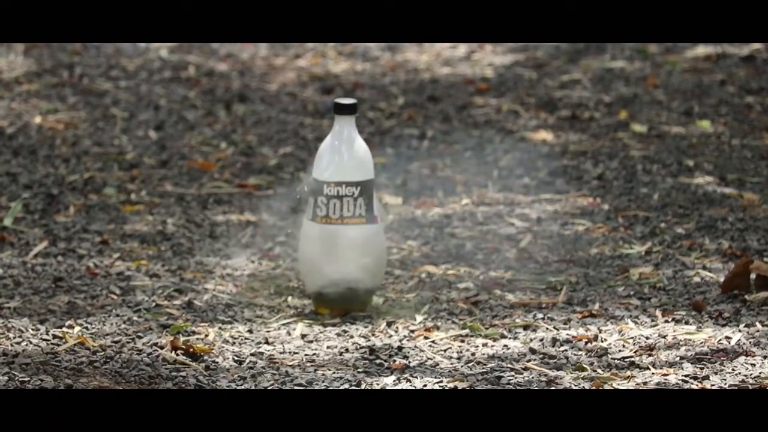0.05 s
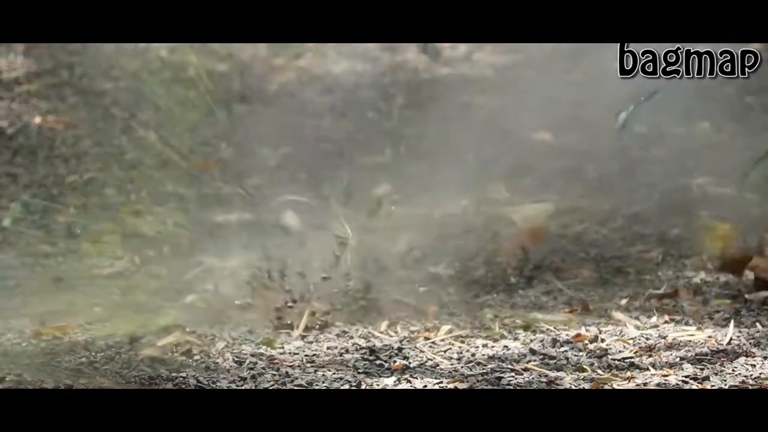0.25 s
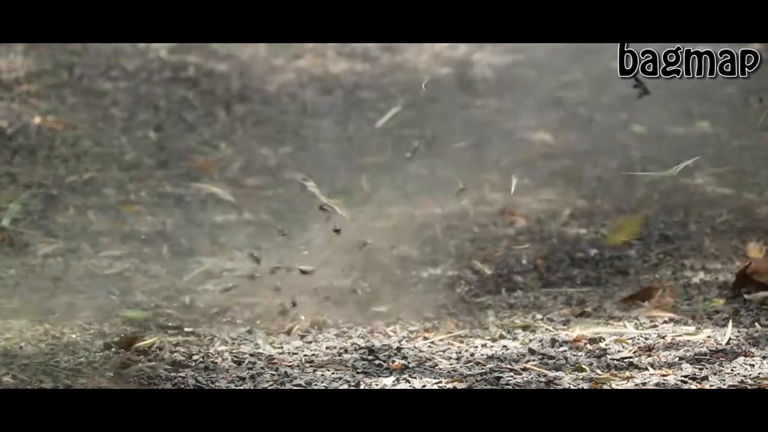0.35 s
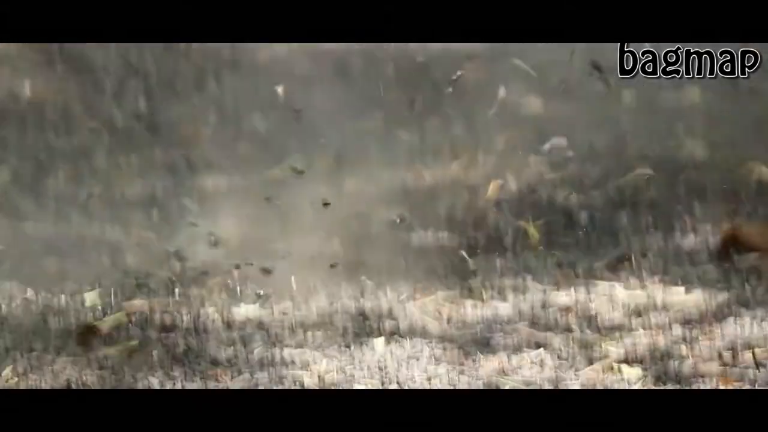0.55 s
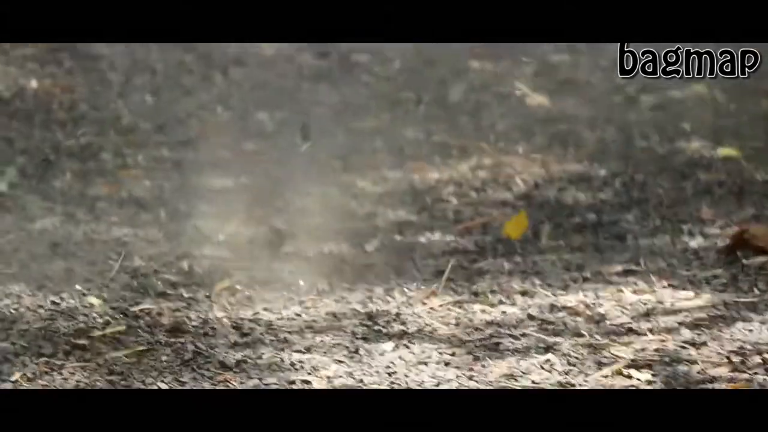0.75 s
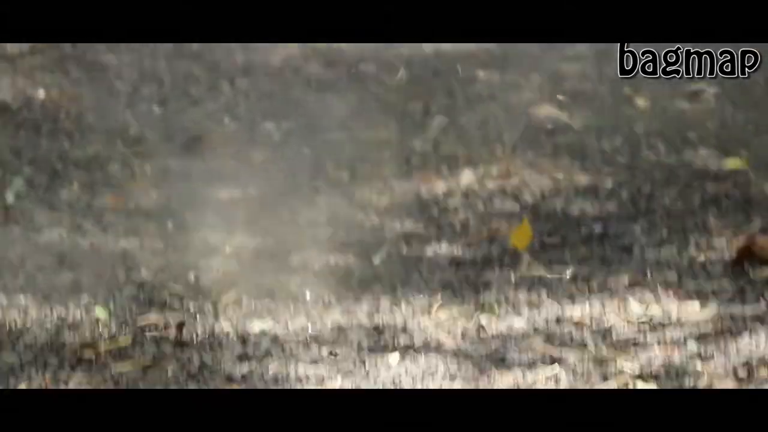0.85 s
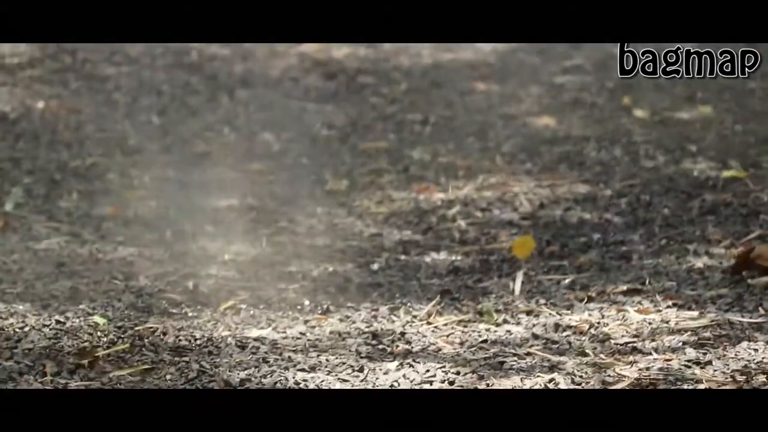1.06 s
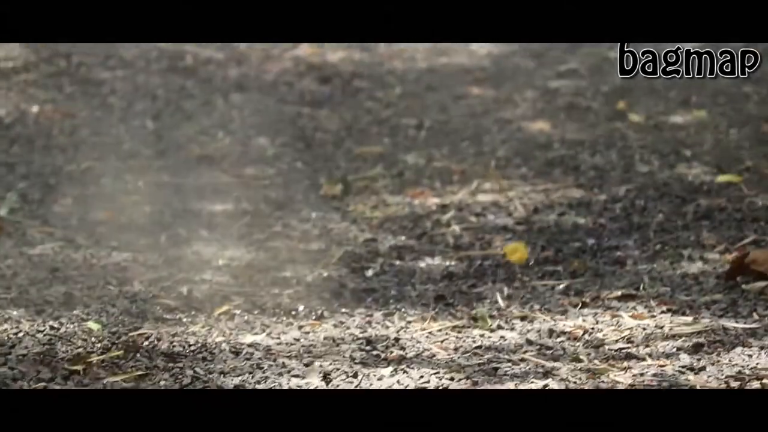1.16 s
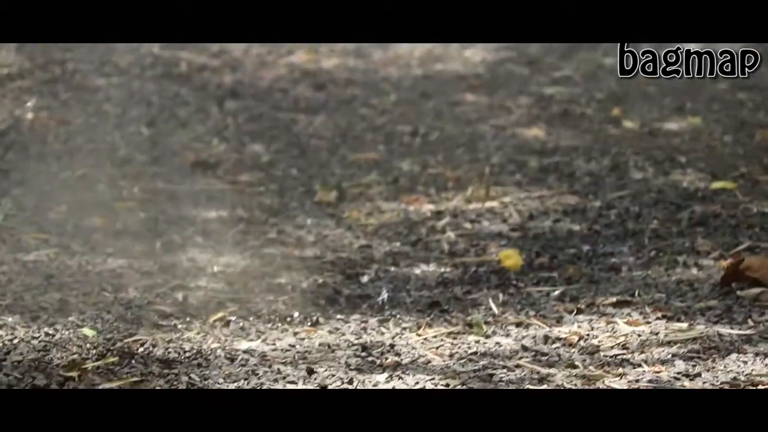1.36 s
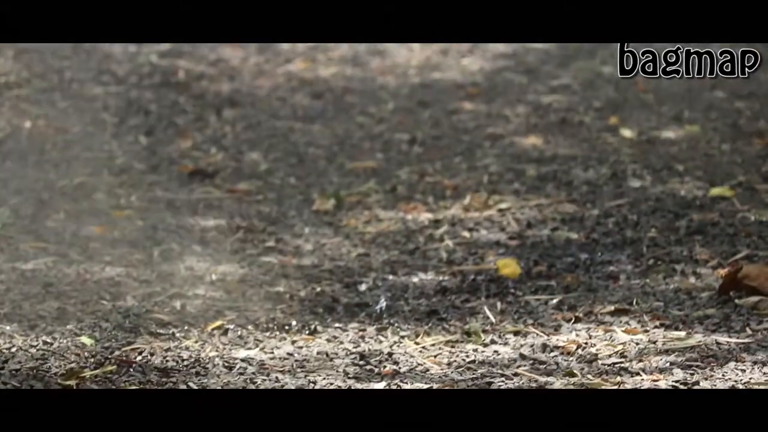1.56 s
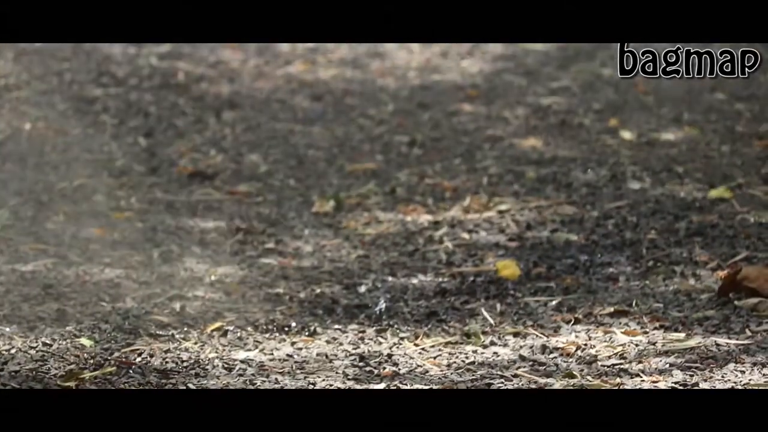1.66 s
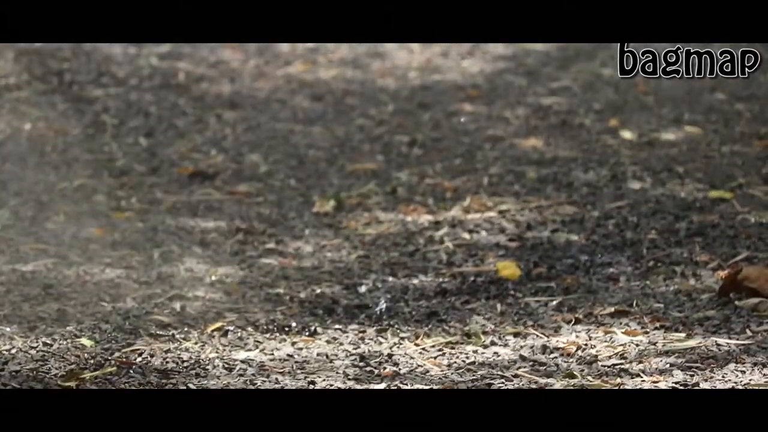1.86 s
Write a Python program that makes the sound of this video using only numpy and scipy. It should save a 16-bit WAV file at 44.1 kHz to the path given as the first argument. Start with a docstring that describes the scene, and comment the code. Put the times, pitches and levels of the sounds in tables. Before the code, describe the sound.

A plastic bottle bursts outdoors with a loud, distorted bang and a rolling echo.

```python
"""A loud, overloaded bang with a rolling echo: a pressurised plastic bottle bursts on open ground.
Just after a faint tick come a shock, a boom of expanding gas and a bright spray of mist and grit.
The blast rolls back from the surroundings, duller the farther it has travelled, with a few distinct
thuds, while grit and droplets patter on leaves. The gain control ducks and slowly recovers, which
holds the rumble up and brings the outdoor hush back."""
import sys
import numpy as np
from scipy import signal
from scipy.fft import rfft, irfft, next_fast_len
from scipy.io import wavfile
from scipy.ndimage import map_coordinates

SR = 44100
rng = np.random.default_rng(int(sys.argv[2]) if len(sys.argv) > 2 else 0)


def transcribe(signal):
    """Save signal, clipped to [-1, 1], as a 16-bit WAV file at the path in sys.argv[1]."""
    frames = np.atleast_2d(signal).T
    limited = np.clip(frames, -1, 1)
    pcm = np.round(limited * 32767).astype(np.int16)
    wavfile.write(sys.argv[1], SR, pcm)


N = 83790

BURST_S = 0.2379
# Diffuse outdoor sound. Each row: frequency in Hz, left-right correlation.
DIFFUSE_CORRELATION = [(60, -0.17), (130, 0.9), (260, 0.51), (600, -0.1), (1500, 0.01), (5000, -0.014)]


def amp(db):
    """Decibels to gain."""
    return 10 ** (np.asarray(db) / 20)


def unit_rms(x):
    """Scale to rms 1."""
    return x / np.sqrt(np.mean(x ** 2) + 1e-20)


def at_hz(points, hz):
    """Interpolate (Hz, value) rows on a log axis."""
    knots_hz, values = np.transpose(points)
    return np.interp(np.log(hz + 1), np.log(knots_hz + 1), values)


def since(start_s):
    """Seconds since start_s, zero before."""
    return np.maximum(np.arange(N) / SR - start_s, 0)


def after_burst(levels):
    """Gain along (s, dB) rows, zero until the burst."""
    return amp(np.interp(since(0), *np.transpose(levels))) * (since(BURST_S) > 0)


def wobble(knots_per_s):
    """Smooth random curve."""
    return map_coordinates(rng.standard_normal(N // 8), [np.arange(N) * knots_per_s / SR], mode="mirror")


def filtered(x, response):
    """Apply response(hz) by FFT."""
    size = next_fast_len(N + SR // 2)
    return irfft(rfft(x, size) * response(np.fft.rfftfreq(size, 1 / SR)), size)[..., :N]


def left_first(x, lead_s):
    """Put the left channel ahead of the right by lead_s."""
    return filtered(x, lambda hz: np.exp(1j * np.pi * hz * lead_s * np.array([[1], [-1]])))


def noise(spectrum, correlation=DIFFUSE_CORRELATION):
    """Stereo noise of rms 1 with a given spectrum and left-right correlation."""
    def response(hz):
        angle = np.arccos(np.clip(at_hz(correlation, hz), -1, 1)) / 2
        return amp(at_hz(spectrum, hz)) * [np.cos(angle), np.sin(angle)]
    mid, side = filtered(rng.standard_normal((2, N)), response)
    return unit_rms(np.array([mid + side, mid - side]))


def burst():
    """The bottle gives way: a shock, a boom of expanding gas, a spray of mist and grit."""
    # Each row: frequency in Hz, relative density in dB.
    boom_spectrum = [(20, -30.5), (50, -6), (100, -2), (250, 0), (500, -6.5), (800, -16.5), (2500, -34.5),
                     (8000, -65.5), (12000, -100)]
    spray_spectrum = [(60, -31), (250, -10.5), (600, -0.5), (1500, -1), (2500, -6.5), (4500, -12),
                      (8000, -22), (10000, -54.5), (16000, -83.5)]
    # Each row: frequency in Hz, left-right correlation.
    boom_correlation = [(80, 1), (300, 0.64), (1500, 0.94)]
    spray_correlation = [(300, 0.75), (1500, 0.62), (4000, 0.43), (8000, -0.28)]
    boom = burst_colour(noise(boom_spectrum, boom_correlation))
    boom *= outflow(level_db=21.66, attack_s=0.00074, hold_s=0.015, fall_db_per_s=255)
    spray = burst_colour(noise(spray_spectrum, spray_correlation))
    spray *= outflow(level_db=17.4, attack_s=0.015, hold_s=0.045, fall_db_per_s=440)
    return shock(level_db=28, push_s=0.0015) + boom + spray


def shock(level_db, push_s):
    """Sudden overpressure, then a longer suction."""
    age = since(BURST_S) / push_s
    return amp(level_db) * (age > 0) * (1 - age) * np.exp(-age)


def outflow(level_db, attack_s, hold_s, fall_db_per_s):
    """Envelope of the escaping gas: attack, hold, sag, and collapse once it is spent."""
    empty_s, collapse_db_per_s = 0.3053, 1695
    fall_db = fall_db_per_s * since(BURST_S + hold_s) + collapse_db_per_s * since(empty_s)
    return np.minimum(since(BURST_S) / attack_s, 1) * amp(level_db - fall_db)


def burst_colour(x):
    """Narrow spectral peaks give the burst noise an uneven, hollow colour; output at rms 1."""
    # Each row: centre in Hz, boost in dB.
    peaks = [(195, 3), (335, 5), (523, 6), (660, 9), (895, 8.5), (1185, 8), (1570, 3), (1837, 8.5),
             (2110, 0), (2338, 0.5)]
    sigma_hz = 24
    def response(hz):
        return amp(sum(db * np.exp(-((hz - centre_hz) / sigma_hz) ** 2 / 2) for centre_hz, db in peaks))
    return unit_rms(filtered(x, response))


def rolling_echo():
    """Countless small, uneven reflections, first from the right, then from the left."""
    # Before air loss. Each row: frequency in Hz, relative density in dB.
    spectrum = [(25, -46), (65, -16.5), (115, -15), (165, -4.5), (285, -1), (335, -7.5), (430, -8),
                (515, -5), (600, -8.5), (850, -8.5), (1400, -12), (2300, -13.5), (4500, -19.5),
                (7800, -32.5), (9300, -71.5)]
    # Each row: frequency in Hz, left-right correlation.
    correlation = [(60, 0.75), (130, 1), (260, 0.74), (500, 0.55), (1000, 0.36), (2000, 0.063),
                   (5000, 0.024)]
    # Each row: time in seconds, level in dB before air loss.
    levels = [(.24, -8), (.29, 9), (.325, 4), (.375, -3.5), (0.416, -2.5), (.46, -5), (.495, -6.5),
              (.57, -4.5), (.615, -4), (0.709, -4.5), (.785, -7), (0.82, -3), (.915, -5), (1.02, -5),
              (1.135, -8), (1.201, -8), (1.35, -10), (1.45, -14.5), (1.56, -12), (1.89, -16)]
    swing_mid_s, swing_length_s, grain_db = 0.811, 0.12, 1.16
    from_right = left_first(noise(spectrum, correlation), lead_s=-0.00042)
    from_left = left_first(noise(spectrum, correlation), lead_s=0.00045)
    swing = np.pi / 2 * np.clip((since(0) - swing_mid_s) / swing_length_s + 0.5, 0, 1)
    reflections = np.cos(swing) * from_right + np.sin(swing) * from_left
    grain = amp(grain_db * wobble(knots_per_s=190))
    return air_loss(unit_rms(reflections * grain)) * after_burst(levels)


def air_loss(x):
    """The air takes more treble from later arrivals."""
    db_per_s_at_1khz, exponent = 5, 1.273
    hz, frame_s, frames = signal.stft(x, SR, nperseg=512)
    travel_s = np.maximum(frame_s - BURST_S, 0)
    loss_db = db_per_s_at_1khz * (hz[:, None] / 1000) ** exponent * travel_s
    return signal.istft(frames * amp(-loss_db), SR)[1][:, :N]


def thuds():
    """Large objects return the pressure wave rounded off, inside a short scatter."""
    # Each row: arrival in seconds, gain in dB, push half-width in seconds, left lead in seconds.
    echoes = [(.305, 13, 0.00051, 0), (0.528, 6, 0.0011, -.0001), (0.667, -7, 0.00089, -.0002),
              (0.835, -1, .0006, .0004), (0.864, -8.5, .0005, .0004), (1.024, -2.5, 0.00067, .0004),
              (1.184, -7, 0.0012, .0003), (1.206, -8, 0.0011, .0004), (1.289, -9, 0.00045, .0004),
              (1.393, -5, 0.00082, .0004), (1.514, -11, 0.00033, .0004), (1.604, -12, 0.00062, .0004)]
    # Each row: frequency in Hz, relative density in dB.
    scatter_spectrum = [(30, -32), (100, -8.5), (240, 1), (500, -6.5), (1000, -14), (3000, -42)]
    scatter_db, scatter_s = -9, 0.0058
    low_hz, high_hz = 83, 1000  # band that survives the trip
    scatter = amp(scatter_db) * noise(scatter_spectrum)
    returns = np.zeros((2, N))
    for arrival_s, gain_db, push_s, lead_s in echoes:
        t = since(0) - arrival_s + lead_s * np.array([[0.5], [-0.5]])
        wave = -2 * t / push_s * np.exp(-(t / push_s) ** 2 / 2)
        returns += amp(gain_db) * (wave + np.exp(-np.abs(t) / scatter_s) * scatter)
    return filtered(returns, lambda hz: 1j * hz / (low_hz + 1j * hz) / (1 + 1j * hz / high_hz))


def bass_swells():
    """Some returns arrive as nothing but smeared bass."""
    # Each row: centre in seconds, level in dB, half-length in seconds.
    swells = [(0.365, -20, .04), (1.202, -20, 0.0092), (1.411, -23.5, 0.048), (1.538, -31.5, 0.062),
              (1.698, -27.5, .03)]
    # Each row: frequency in Hz, relative density in dB.
    spectrum = [(20, -16.5), (45, -5), (72, 4.5), (130, -3), (250, -28), (1000, -100)]
    envelope = sum(amp(db) * np.exp(-((since(0) - centre_s) / half_s) ** 2)
                   for centre_s, db, half_s in swells)
    return envelope * noise(spectrum)


def fallout():
    """Grit and droplets rain back on the leaves in a faint patter."""
    # Each row: time in seconds, level in dB.
    levels = [(.45, -70.5), (.78, -43.5), (1.0, -55.5), (1.3, -49), (1.481, -59), (1.75, -52.5),
              (1.89, -49.5)]
    # Each row: frequency in Hz, relative density in dB.
    spectrum = [(500, -20.5), (2000, -10), (4000, -6), (6000, -9.5), (7800, -15.5), (9000, -46)]
    flutter_db = 2
    patter = noise(spectrum) * amp(flutter_db * wobble(knots_per_s=830))
    return unit_rms(patter) * after_burst(levels)


def tick(start_s, level_db, decay_s):
    """A faint dry tick of decaying noise."""
    # Each row: frequency in Hz, relative density in dB.
    spectrum = [(500, -24), (2500, 8), (5000, -16), (7800, -24), (9000, -55)]
    age_s = since(start_s)
    return amp(level_db) * (age_s > 0) * np.exp(-age_s / decay_s) * noise(spectrum)


def hush(level_db):
    """Quiet, steady outdoor air."""
    # Each row: frequency in Hz, relative density in dB.
    spectrum = [(20, -15), (32, -8), (60, 4.5), (130, -2), (250, -1), (420, 5), (700, 1), (1200, -3),
                (1900, -5.5), (2450, -4.5), (4500, -16), (7600, -28.5), (9000, -48.5)]
    return amp(level_db) * noise(spectrum)


def scene():
    """Stereo sum at the microphone; all source levels are ahead of the gain control."""
    blast = burst() + rolling_echo() + thuds() + bass_swells()
    background = hush(level_db=-37) + tick(start_s=0.1, level_db=-32.5, decay_s=0.0033)
    return blast + background + fallout()


def gain_control(x):
    """Overload turns the gain down; it creeps back at a steady rate."""
    max_duck_db, lag_s, recover_db_per_s = 22.5, 0.014, 13.5
    over_db = np.clip(20 * np.log10(np.abs(x).max(axis=0) + 1e-9), 0, max_duck_db)
    ramp_db = recover_db_per_s * since(0)
    held_db = np.maximum.accumulate(over_db + ramp_db) - ramp_db
    pole = np.exp(-1 / (lag_s * SR))
    duck_db = signal.lfilter([1 - pole], [1, -pole], held_db)
    return x * amp(-duck_db)


def record(dry):
    """Gain control too slow for the blast, heavy clipping, a dull top, a brighter right channel."""
    # Each row: frequency in Hz, gain in dB.
    tone = [(5000, 3.5), (8000, 6), (10500, -9), (12500, -20), (16000, -23.5), (20000, -47.5)]
    # Each row: frequency in Hz, right minus left in dB.
    balance = [(300, -0.3), (1200, 0.5), (4000, -0.3), (8000, 3)]
    clip_level, hardness, top_hz = 0.67, 11, 20000
    def response(hz):
        gain_db = at_hz(tone, hz) + at_hz(balance, hz) * np.array([[-0.5], [0.5]])
        return amp(gain_db) * (hz < top_hz)
    ducked = gain_control(dry)
    clipped = ducked / (1 + np.abs(ducked / clip_level) ** hardness) ** (1 / hardness)
    return filtered(clipped, response)


dry = scene()
out = record(dry)
transcribe(out)
```